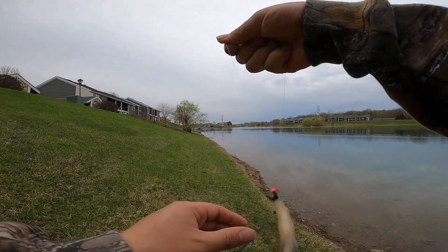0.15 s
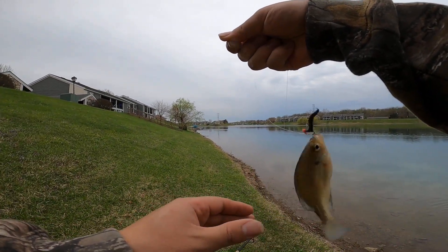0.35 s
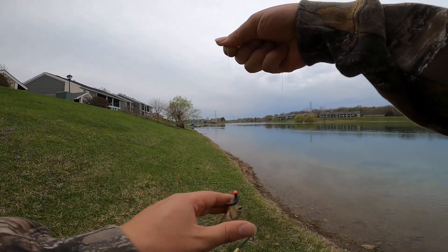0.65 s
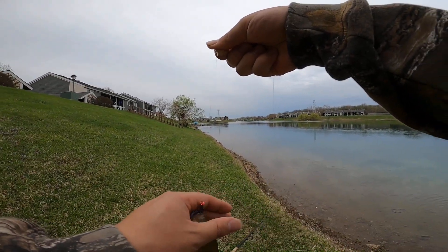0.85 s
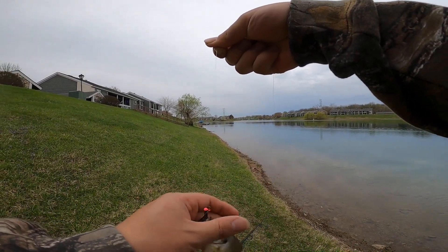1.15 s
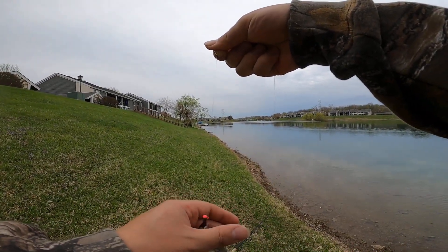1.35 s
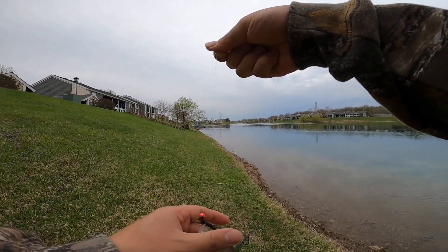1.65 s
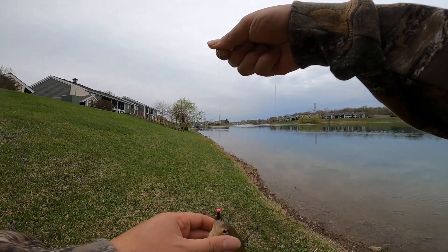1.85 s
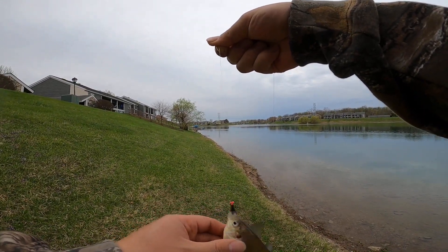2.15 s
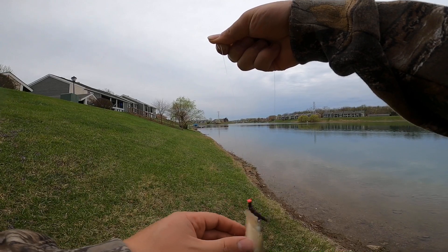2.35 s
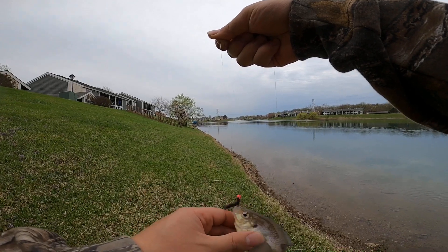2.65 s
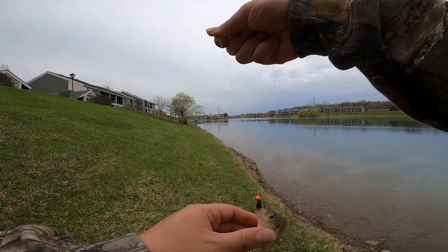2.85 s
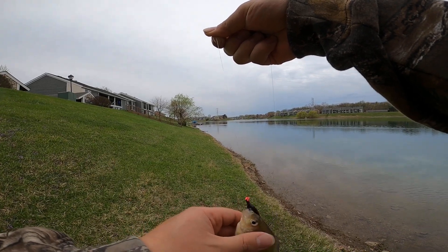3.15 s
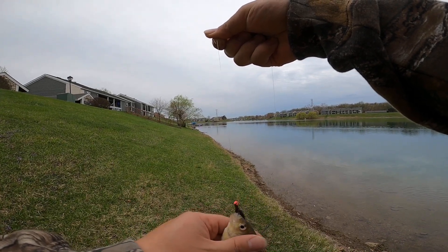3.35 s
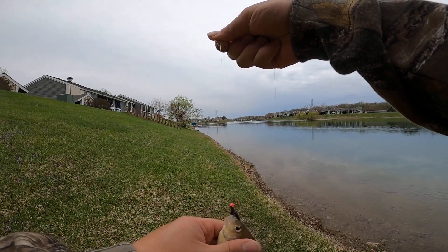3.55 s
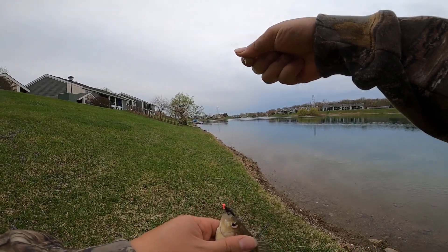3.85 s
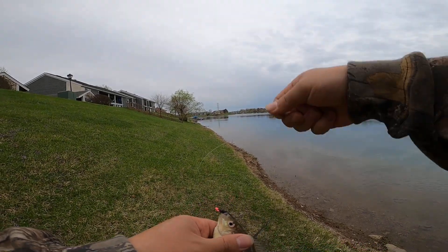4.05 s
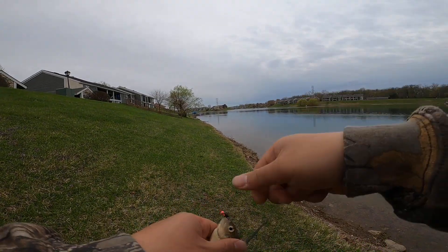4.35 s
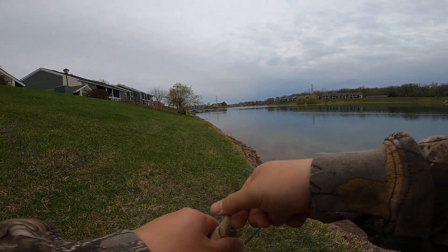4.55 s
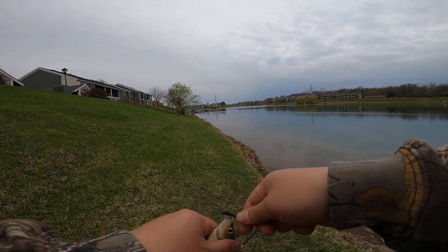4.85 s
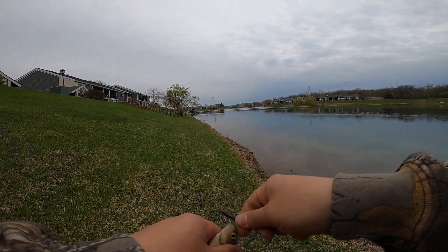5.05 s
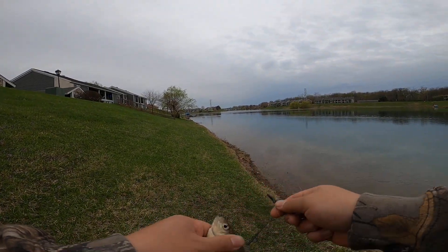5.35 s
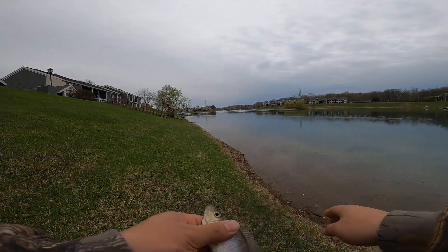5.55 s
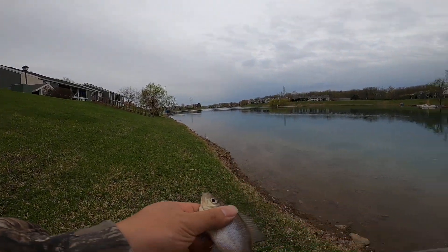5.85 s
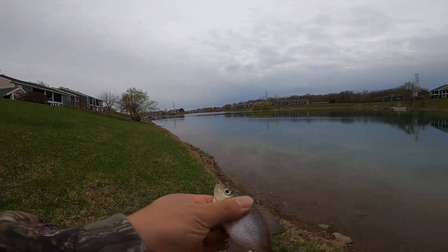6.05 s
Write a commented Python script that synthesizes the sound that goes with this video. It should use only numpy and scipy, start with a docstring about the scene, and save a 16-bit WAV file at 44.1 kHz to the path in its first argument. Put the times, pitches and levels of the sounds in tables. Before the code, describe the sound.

Close wet clicks and squelches of a small fish being handled, with birdsong echoing outdoors, a faint motor drone and puffs of wind.

```python
"""Pond with birds and an angler

Small birds sing around a pond while an angler unhooks a small fish close to the microphone.
Pitch curves drive sines for whistles, chips and a buzzing trill; filtered echoes scatter them from the banks.
Shaped noise bursts make wet fingers and line tick; swelling noise makes the sleeve rustle and the wind puff.
Wavering tones under it are a distant engine drone, a second motor and a hum; noise is the far traffic."""
import sys
import numpy as np
from scipy import signal
from scipy.fft import rfft, irfft
from scipy.io import wavfile
from scipy.ndimage import uniform_filter1d

SR = 44100
rng = np.random.default_rng(int(sys.argv[2]) if len(sys.argv) > 2 else 0)


def wrap_up_sound(samples):
    """Save the sound to the file named by the first command line argument, as 16-bit audio."""
    columns = np.atleast_2d(samples).T
    # keep every value between -1 and 1, then stretch to whole-number steps
    tamed = np.clip(columns, -1, 1)
    steps = np.round(tamed * 32767).astype(np.int16)
    wavfile.write(sys.argv[1], SR, steps)


N = 273420
TIME = np.arange(N) / SR
FREQ = np.fft.rfftfreq(N, 1 / SR)

# Table pitches and levels are nominal: waver, flicker, pan, gains and echoes come on top.

# Arched phrase. Each row: time from its start in seconds, pitch in Hz, relative level in dB.
ARCH_SHAPE = [(0, 3250, -11), (.011, 4750, -7), (.025, 4950, -6), (.042, 4550, -1), (.053, 3750, -4),
              (.064, 3200, -13), (.086, 3000, -9), (.11, 3750, -5), (.133, 4500, -6), (.147, 3500, -9)]
# Thin lisp. Each row: time from its start in seconds, pitch in Hz, relative level in dB.
LISP_SHAPE = [(0, 5650, -11), (.025, 5860, -6), (.04, 6100, -6), (.054, 6610, -17.5)]
# Lisp and arch together. Each row: arch start in seconds, arch level in dB, lisp level in dB,
# clearness of the direct path in dB.
PHRASES = [(-.003, -57.5, -72, -0.5), (0.579, -60.5, -78, 1.5), (1.554, -57.5, -61.5, 4),
           (2.065, -56.5, -64.5, 2), (2.648, -56, -63, 0.5), (3.275, -60, -69.5, -1),
           (3.947, -59, -71.5, 1.5), (5.824, -65, -74, 0.5)]
LISP_LEAD_S = .046
# Distant engine level. Each row: time in seconds, level in dB.
DRONE_LEVEL = [(0, -60), (.7, -60), (.92, -44.5), (1.05, -54.5), (1.6, -51), (1.9, -61.5), (2.15, -55),
               (2.38, -43), (2.6, -51.5), (3.3, -54), (3.6, -49), (4.5, -48.5), (5.2, -49.5), (5.7, -55.5),
               (6.2, -49.5)]
DRONE_HZ, DRONE_SAG_HZ_PER_S2 = 125.6, .195
# Second, higher motor that runs down. Each row: time in seconds, pitch in Hz, level in dB.
MOTOR = [(0, 230.3, -61), (1, 230.3, -69.5), (2, 227.7, -72), (4.2, 216.4, -71.5), (4.6, 213.7, -68),
         (6.2, 213, -69.5)]
# Electric hum. Each row: frequency in Hz, level in dB.
HUM_LINES = [(60, -56.5), (120.3, -60.5), (240.3, -65), (361, -76.5)]
# Far traffic and open air. Each row: frequency in Hz, relative density in dB per Hz.
AIR_SPECTRUM = [(25, -6.5), (45, -3.5), (65, 3.5), (105, -3), (160, -9), (210, -17), (300, -23),
                (500, -27.5), (800, -34), (1050, -29), (1900, -50), (4000, -67), (7500, -62.5),
                (10500, -75.5)]
AIR_DB = -48.5
# Faint hiss from the houses. Each row: frequency in Hz, relative density in dB per Hz.
SHORE_SPECTRUM = [(700, -7.5), (1500, 15.0), (2600, -3.5), (4200, -11.5), (6000, -13.5), (15000, -56.5)]
# Tyres singing on a far road. Each row: time in seconds, pitch in Hz, level in dB.
TYRE_BAND = [(0, 1051, -72), (2.2, 997.5, -83), (3.2, 1015, -81), (4.1, 1126, -72), (4.35, 1354, -73),
             (4.8, 1051, -85.5), (6.2, 1051, -71)]
# Wind at the ports. Each row: frequency in Hz, relative density in dB per Hz.
WIND_SPECTRUM = [(20, 7), (45, 14.5), (70, -6.5), (120, -25.5), (300, -26.5), (2000, -79.0)]
# Puffs of wind. Each row: peak time in seconds, half length in seconds, level in dB.
PUFFS = [(1.44, 0.088, -48), (1.63, 0.046, -51), (4.3, 0.33, -64.5), (5.3, 0.14, -59.5),
         (5.935, 0.022, -33.5), (6.02, 0.019, -33), (6.14, 0.15, -50)]
# Cloth. Each row: frequency in Hz, relative density in dB per Hz.
SLEEVE_SPECTRUM = [(200, 12.5), (500, 8), (1200, 4.5), (2500, 2), (4500, -3.5), (7500, -9.5), (10000, -24),
                   (15000, -30.5)]
# Arm movements that rub the sleeve. Each row: peak time in seconds, half length in seconds, level in dB.
RUBS = [(.1, 0.22, -80), (.45, 0.7, -75), (1.55, 0.13, -70.5), (2.65, 0.24, -76), (3.22, 0.17, -75),
        (4.22, 0.37, -72.5), (5.1, 0.32, -71), (6.19, 0.29, -59.5)]
SLEEVE_REST_DB = -86.5
# Wet skin. Each row: frequency in Hz, relative density in dB per Hz.
CRACKLE_SPECTRUM = [(400, -16.5), (1300, 6), (3500, 5.5), (5500, -1.5), (8500, -3.5), (11000, -13.5),
                    (15000, -30)]
# Snaps of line and wet skin. Each row: time in seconds, level in dB, ring in Hz,
# crackle relative to the ring in dB, left minus right in dB.
SNAPS = [(0.04, -42.5, 7400, -22, -3), (0.2255, -37.5, 3250, -6, -1), (0.258, -48.5, 6500, -14, -13),
         (0.3251, -55, 6160, -22, -13), (0.511, -57, 6700, -20, -12), (0.521, -55.5, 8600, -10, 3),
         (.591, -57.5, 8800, -14, 3), (0.8397, -53, 7800, 0, -3), (.971, -68, 9900, -14, 0),
         (1.1056, -52.5, 4970, -6, -8), (1.125, -65, 8500, 0, -2), (1.1612, -52.5, 6800, -18, -10),
         (1.206, -49, 8440, -19, -2), (1.246, -77, 7000, 0, -2), (1.428, -65, 7600, -8, -8),
         (1.457, -61, 6200, -14, -6), (1.596, -33, 3370, -5.5, 0), (1.619, -63, 7800, -4, -3),
         (1.6895, -72, 7800, -10, -3), (1.741, -65, 8340, 4, -2), (2.1457, -48, 7140, -7, -4),
         (2.64, -45, 3620, -4, 0), (2.6805, -57, 3300, 2, 2), (3.883, -58, 8400, 4.5, -4),
         (3.8985, -55, 7540, -6, -8), (6.159, -46.5, 3960, -1.5, -2)]
SNAP_S, SNAP_Q = 0.00064, 4
# Fingers slipping on the wet fish. Each row: time in seconds, level in dB, ring in Hz, nominal length in seconds.
SQUELCHES = [(0.0116, -63, 5900, 0.0025), (0.062, -71, 7000, .003), (0.186, -67, 3600, 0.006),
             (0.199, -61.5, 8000, 0.0065), (0.339, -64.5, 6700, 0.0023), (.399, -74, 7460, .008),
             (0.424, -63.5, 4120, 0.0033), (0.435, -72, 3000, .003), (0.531, -65.5, 7500, .002),
             (0.835, -67, 5500, 0.0071), (1.014, -51.5, 1320, 0.0034), (1.054, -60.5, 2290, 0.006),
             (1.067, -65, 7000, 0.007), (1.087, -76, 4000, .015), (1.177, -77, 9000, .004),
             (1.2, -78, 9000, .005), (1.205, -60, 1520, .002), (1.301, -67, 2000, 0.0052),
             (1.311, -68, 2500, 0.0075), (1.319, -57, 7900, 0.0022), (1.45, -62, 6860, 0.0033),
             (1.473, -59, 6700, 0.00095), (1.562, -56.5, 2120, 0.0078), (1.578, -53.5, 7000, 0.0033),
             (1.602, -63, 9450, 0.004), (1.748, -71, 4550, 0.008), (4.673, -70, 8050, 0.0067),
             (4.747, -72, 6750, 0.0039), (4.762, -75, 6500, .003)]
SQUELCH_Q, SQUELCH_CRACKLE_DB, SQUELCH_PAN_DB = 3.8, 4, -2.5
# Faint ticks while the fish wriggles
STRUGGLE_S, FIDGET_DB = 1.7, -81
# Raspy gliding notes. Each row: start in seconds, length in seconds, start in Hz, end in Hz, level in dB.
ZEES = [(0.083, .07, 5900, 6970, -75), (0.196, 0.057, 6600, 7970, -71), (2.729, 0.095, 5620, 7700, -70.5),
        (2.808, 0.057, 6970, 6100, -73.5), (2.869, 0.066, 5780, 7500, -69), (5.129, 0.042, 6500, 5370, -70),
        (5.2, .09, 5300, 6880, -67), (5.261, 0.07, 3460, 4690, -64)]
ZEE_RASP_HZ = 337
# Clear whistles. Each row: start in seconds, length in seconds, start in Hz, end in Hz, level in dB.
WHISTLES = [(0.122, 0.03, 5770, 5900, -57), (0.546, .028, 5920, 5860, -74), (0.584, 0.03, 5600, 5080, -70),
            (1.624, 0.015, 3800, 3900, -60.5), (1.795, 0.038, 3300, 3250, -76),
            (2.65, .04, 5350, 4900, -67), (2.723, 0.072, 3020, 3160, -62),
            (2.924, 0.097, 4680, 4620, -77.5), (3.382, 0.076, 2710, 2630, -78.5),
            (3.714, 0.13, 2514, 2480, -77), (3.796, 0.22, 2230, 2230, -79),
            (3.903, 0.071, 3105, 3045, -68.5), (3.978, 0.064, 2680, 2650, -73),
            (4.367, 0.036, 2564, 2705, -68), (4.405, 0.055, 2020, 1900, -73.5),
            (4.447, 0.096, 2460, 2740, -65.5), (5.16, 0.033, 2160, 2085, -70),
            (5.181, 0.0086, 3700, 4900, -62), (5.431, 0.041, 2350, 2420, -73),
            (5.463, 0.075, 3180, 2920, -68), (5.832, .05, 4840, 4490, -71), (5.868, 0.083, 5730, 5650, -77),
            (5.95, 0.022, 7500, 7950, -78), (6.013, 0.019, 3300, 4300, -64)]
# Fish kicks that jolt the hand. Each row: time in seconds, level in dB, pitch in Hz.
THUMPS = [(0.224, -40, 164), (1.013, -34.5, 118), (1.576, -48.5, 177)]
# Scooping syllable. Each row: time from its start in seconds, pitch in Hz, relative level in dB.
SCOOP_SHAPE = [(0, 1400, -21), (.011, 1720, -12), (.023, 2400, -3), (.035, 2570, 0), (.05, 2370, -6),
               (.057, 2750, -9), (.062, 5200, -14), (.069, 7500, -19)]
# Each row: scoop start in seconds, level in dB.
SCOOP_TIMES = [(0.233, -63), (0.611, -63.5), (0.993, -63), (1.286, -64), (1.624, -65.5), (1.927, -69),
               (2.278, -62), (2.586, -59.5)]
# Notes that fall ever faster. Each row: start in seconds, length in seconds, top pitch in Hz, level in dB.
SLURS = [(0.91, 0.027, 4180, -76), (3.236, 0.04, 2950, -68), (3.665, 0.039, 3000, -73.5),
         (4.35, 0.033, 3596, -62), (4.397, 0.014, 2670, -67), (4.652, 0.036, 3720, -65),
         (4.885, 0.038, 3560, -62), (5.092, 0.031, 3610, -61.5), (5.202, 0.039, 5007, -60),
         (5.222, 0.031, 3050, -73)]
SLUR_DROP, SLUR_BEND = 0.41, 1.7  # share of the pitch lost, power of time by which it goes
# Chip. Each row: time from its start in seconds, pitch in Hz, relative level in dB.
CHIP_SHAPE = [(0, 5300, -12), (.007, 5680, -1), (.014, 5820, 0), (.023, 5620, -2), (.03, 5150, -16)]
# Each row: chip start in seconds, level in dB.
CHIP_TIMES = [(2.803, -61), (5.162, -44)]
# Husky notes of a far warble. Each row: start in seconds, length in seconds, start in Hz, end in Hz, level in dB.
WARBLES = [(4.785, 0.047, 2340, 2490, -77.5), (4.841, 0.053, 2120, 2450, -74),
           (4.878, 0.057, 2500, 2406, -68.5), (4.914, 0.064, 2370, 2140, -73.5),
           (4.944, 0.091, 2620, 2444, -73), (4.985, .03, 2080, 1950, -74.5), (5.026, .075, 2750, 2760, -71),
           (5.032, .09, 2320, 2500, -72), (5.161, 0.044, 2760, 2730, -74), (5.185, .03, 2450, 2410, -73),
           (5.245, 0.081, 2030, 2200, -70), (5.333, 0.036, 2960, 2654, -72.5)]
# Buzzing trill, which sags and then climbs. Each row: time in seconds, centre pitch in Hz.
BUZZ_PITCH = [(5.21, 4190), (5.32, 4040), (5.5, 4195), (5.66, 4270)]
BUZZ_START_S, BUZZ_LENGTH_S, BUZZ_ATTACK_S, BUZZ_RELEASE_S = 5.218, 0.446, 0.03, 0.012
BUZZ_DB = -64.5
# Swelling whistle that breaks into wiggles. Each row: time from its start in seconds, pitch in Hz,
# relative level in dB.
FLOURISH_SHAPE = [(0, 2050, -14), (.012, 2400, -5), (.03, 2430, -3), (.058, 2570, 2), (.084, 2590, 0),
                  (.091, 2800, -8), (.115, 2530, -6), (.138, 3050, -5), (.155, 2350, -1), (.164, 2020, -15),
                  (.176, 2330, -4), (.19, 2000, -17), (.208, 2650, -17), (.218, 2430, -1),
                  (.227, 1950, -15), (.234, 2150, -15), (.241, 2380, -2), (.25, 2020, -12),
                  (.266, 2350, -14)]
FLOURISH_START_S, FLOURISH_DB = 5.515, -59
# Runs of tiny sliding notes. Each row: start in seconds, length in seconds, centre pitch in Hz, level in dB,
# notes per second, slide within a note in Hz.
TWITTERS = [(5.531, 0.2, 3510, -70.5, 47, 447), (5.747, 0.172, 3090, -66, 48.6, -600)]
TOP_HZ = 15500


def undb(db):
    """Decibels to gain."""
    return 10 ** (np.asarray(db) / 20)


def unit(x):
    """Scale to rms 1."""
    return x / np.sqrt(np.mean(x ** 2))


def curves(rows, t):
    """Each column of a table, joined by straight lines at times t."""
    s, *columns = np.transpose(rows)
    return [np.interp(t, s, c) for c in columns]


def walk(rate_hz, size=N):
    """Smooth random wander with a spread near 1."""
    k = int(SR / rate_hz)
    steps = np.repeat(rng.standard_normal(size // k + 2), k)
    return np.sqrt(2) * uniform_filter1d(uniform_filter1d(steps, k), k)[:size]


def noise(spectrum):
    """Noise of rms 1 with the given spectrum, rolled off below 20 Hz."""
    hz, db = np.transpose(spectrum)
    gain = undb(np.interp(np.log(FREQ + 1), np.log(hz), db))
    gain = gain * FREQ ** 2 / (FREQ ** 2 + 20 ** 2)
    return unit(irfft(rfft(rng.standard_normal(N)) * gain, N))


def tone(hz):
    """A sine of rms 1 that follows a pitch curve."""
    return np.sqrt(2) * np.sin(2 * np.pi * np.cumsum(hz) / SR + rng.uniform(0, 2 * np.pi))


def add(track, start_s, x):
    """Mix a short sound into a track."""
    i = int(start_s * SR)
    a, b = max(i, 0), min(i + x.shape[-1], N)
    track[..., a:b] += x[..., a - i:b - i]


def place(x, pan_db, lag_ms):
    """Two microphone ports: the left is pan_db louder and hears the sound lag_ms later."""
    late = irfft(rfft(x) * np.exp(-2j * np.pi * FREQ * lag_ms / 1000), N)
    return np.array([late * undb(pan_db / 2), x * undb(-pan_db / 2)])


def banks(x, near_db, far_db, near_t60_s=0.41, far_t60_s=0.78, split_hz=4900, treble_t60_s=0.5):
    """Lawn and house walls scatter quickly, trees across water return a long tail; air takes treble first."""
    t = TIME[:SR]
    tails = rng.standard_normal((2, 2, SR)) * np.clip((t - .004) / 0.0085, 0, 1)
    low = signal.sosfiltfilt(signal.butter(4, split_hz, fs=SR, output="sos"), tails)
    tails = low + (tails - low) * undb(-60 * t / treble_t60_s)
    near = unit(tails[0] * undb(-60 * t / near_t60_s)) / np.sqrt(SR)
    far = unit(tails[1] * undb(-60 * t / far_t60_s)) / np.sqrt(SR)
    echoes = undb(near_db) * near + undb(far_db) * far
    return signal.fftconvolve(x[None], echoes, axes=1)[:, :N]


def branches(x, span_s=0.019, count=14):
    """A call from inside a tree arrives by many short paths, which break up its glide."""
    taps = np.zeros((2, int(SR * .1)))
    for side in taps:
        share, size = rng.uniform(0.026, 1, count), rng.standard_normal(count)
        delays = (share * min(span_s, .09) * SR).astype(int)
        np.add.at(side, delays, unit(size * np.exp(-share)) / np.sqrt(count))
    return signal.fftconvolve(x[None], taps, axes=1)[:, :N]


def syllables(shape, times, waver, third_db=None, flicker_db=3.5):
    """One gliding syllable, a little different each time; a near voice shows its third harmonic."""
    out, t = np.zeros(N), np.arange(int(shape[-1][0] * SR)) / SR
    hz, db = curves(shape, t)
    fade = signal.windows.tukey(len(t), .12)
    for start_s, level_db in times:
        pitch_hz = hz * (1 + waver * walk(250, len(t)))
        voice = tone(pitch_hz)
        if third_db is not None:
            voice = voice + undb(third_db) * tone(3 * pitch_hz)
        gain = undb(level_db + db + flicker_db * walk(143, len(t)))
        add(out, start_s, voice * gain * fade)
    return out


def note(track_hz, db, taper):
    """A whistled note along a pitch curve, faded in and out."""
    return tone(track_hz) * undb(db) * signal.windows.tukey(len(track_hz), min(taper, 1))


def glides(rows, waver_hz, rate_hz, taper):
    """Notes gliding straight from one pitch to another, with random waver."""
    out = np.zeros(N)
    for start_s, length_s, from_hz, to_hz, db in rows:
        size = int(length_s * SR)
        pitch_hz = np.linspace(from_hz, to_hz, size) + waver_hz * walk(rate_hz, size)
        add(out, start_s, note(pitch_hz, db, taper))
    return out


def swells(rows, sharpness):
    """Gain of smooth rises and falls, one for each row, summed in power."""
    return np.sqrt(sum(undb(2 * db) * np.exp(-2 * np.abs((TIME - s) / half_s) ** sharpness)
                       for s, half_s, db in rows))


def arch_singer(paths_db=-6.5, direct_db=-4.5, wall_s=0.015, wall_db=-12.5):
    """A far bird repeats a lisp and an arched phrase, which branches scatter and a house wall returns."""
    arches = [(s, db) for s, db, _, _ in PHRASES]
    lisps = [(s - LISP_LEAD_S, db) for s, _, db, _ in PHRASES]
    song = syllables(ARCH_SHAPE, arches, waver=0.026, flicker_db=2.5)
    song = song + syllables(LISP_SHAPE, lisps, waver=0.025)
    clear_db, = curves([(s, db) for s, _, _, db in PHRASES], TIME - LISP_LEAD_S)
    direct = undb(direct_db + clear_db) * place(song, pan_db=9.0, lag_ms=-0.084)
    wall = undb(wall_db) * place(np.interp(TIME - wall_s, TIME, song), pan_db=8.5, lag_ms=0.08)
    paths = undb(paths_db) * branches(song, span_s=.016)
    return direct + paths + wall + banks(song, near_db=-7.5, far_db=-13, near_t60_s=.22)


def hum(waver_db=2.0, beat=0.45, octave_db=-19):
    """Two far motors and an electric hum: sines that moving air makes waver."""
    drone_hz = DRONE_HZ - DRONE_SAG_HZ_PER_S2 * TIME ** 2
    drone_db, = curves(DRONE_LEVEL, TIME)
    lines = [(drone_hz, drone_db), (2 * drone_hz, drone_db + octave_db), tuple(curves(MOTOR, TIME))]
    lines += [(hz + 0.732 * walk(6), db) for hz, db in HUM_LINES]
    out = np.zeros(N)
    for hz, db in lines:
        # a second path, drifting in strength and phase, beats against the first
        out += (tone(hz) + beat * walk(26) * tone(hz)) * undb(db + waver_db * walk(14))
    return place(out, pan_db=1, lag_ms=.09)


def open_air(side_db=-11, side_hz=500, shore_db=-80):
    """Far traffic from one side, more diffuse towards the treble; faint hiss from houses on the left."""
    wash = noise(AIR_SPECTRUM) * undb(.9 * walk(3.1) + 1.2 * walk(16))
    tilt = (FREQ + side_hz / 4) / (FREQ + side_hz)
    side = irfft(rfft(noise(AIR_SPECTRUM)) * tilt, N) * undb(side_db)
    traffic = undb(AIR_DB) * (place(wash, pan_db=0.0, lag_ms=0.14) + np.array([side, -side]))
    shore = noise(SHORE_SPECTRUM) * undb(shore_db + 0.25 * walk(3.8))
    return traffic + place(shore, pan_db=2.0, lag_ms=0)


def tyres(width_hz=110):
    """A narrow band of tread noise that drifts in pitch: a sine multiplied by low noise."""
    hz, db = curves(TYRE_BAND, TIME)
    flutter = noise([(20, 0), (width_hz, 0), (4 * width_hz, -24), (10000, -90)])
    return place(tone(hz) * flutter * undb(db), pan_db=0.5, lag_ms=0.12)


def wind(eddy_db=-57):
    """Low noise: independent air eddies at each port, and puffs mostly on the right one."""
    eddies = undb(eddy_db) * np.array([noise(WIND_SPECTRUM), noise(WIND_SPECTRUM)])
    puffs = noise(WIND_SPECTRUM) * swells(PUFFS, sharpness=1.8)
    return eddies + place(puffs, pan_db=-11, lag_ms=0)


def sleeve(rub_db=1.5, rasp_db=-27):
    """Cloth noise swells as the arm moves, brighter when it rubs harder."""
    rub = swells(RUBS, sharpness=1.64) + undb(SLEEVE_REST_DB)
    cloth = place(noise(SLEEVE_SPECTRUM), pan_db=3.0, lag_ms=0.029)
    cloth = cloth + undb(-1.5) * np.array([noise(SLEEVE_SPECTRUM), noise(SLEEVE_SPECTRUM)])
    rasp = undb(rasp_db) * rub / rub.max() * rng.standard_normal((2, N))
    return (cloth + rasp) * rub * undb(rub_db * walk(120))


def chorus(count=260, low_hz=2200, high_hz=4800, slide=.16):
    """Many birds far across the water: random short glides blurred into a murmur of echoes."""
    out = np.zeros(N)
    for when, pitch, length, glide, loud in rng.random((count, 5)):
        size = int((0.018 + 0.044 * length) * SR)
        centre_hz = low_hz * (high_hz / low_hz) ** pitch
        hz = centre_hz * (1 + slide * (2 * glide - 1) * np.linspace(-1, 1, size))
        add(out, when * N / SR, tone(hz) * (1 + loud) * np.hanning(size))
    out = unit(out)
    return undb(-92.0) * (place(out, pan_db=18.5, lag_ms=0.025) + banks(out, near_db=5.5, far_db=-8))


def handling(grain_db=5.5, uneven_db=4.5, rise=0.59, lag_ms=0.028):
    """Wet skin and line tick: resonant snaps with broad crackle, in short noise bursts."""
    out, t, crackle = np.zeros((2, N)), TIME[:2048] - TIME[512], noise(CRACKLE_SPECTRUM)
    bursts = [(s, db, hz, SNAP_Q, SNAP_S, broad_db, pan_db) for s, db, hz, broad_db, pan_db in SNAPS]
    fidgets = [(STRUGGLE_S * when, FIDGET_DB + 6 * (loud - .5), 4000 + 6000 * pitch, .0015)
               for when, loud, pitch in rng.random((55, 3))]
    bursts += [(s, db, hz, SQUELCH_Q, length_s, SQUELCH_CRACKLE_DB, SQUELCH_PAN_DB)
               for s, db, hz, length_s in SQUELCHES + fidgets]
    for k, (start_s, db, hz, q, length_s, broad_db, pan_db) in enumerate(bursts):
        envelope = np.exp(-np.abs(t) / length_s / np.where(t < 0, rise, .7))
        envelope = envelope * undb(grain_db * walk(974, len(t)) + uneven_db * walk(350, len(t)))
        b, a = signal.iirpeak(min(hz, .4 * SR), max(q, 1), fs=SR)
        snap = signal.lfilter(b, a, signal.lfilter(b, a, envelope * rng.standard_normal(len(t))))
        burst = unit(snap) + undb(broad_db) * unit(envelope * crackle[k * len(t):][:len(t)])
        # level refers to the burst's nominal length, not to the whole window
        burst = burst * np.sqrt(length_s * SR / len(t) / 2)
        sides_db = db + np.array([[pan_db], [-pan_db]]) / 2
        add(out, start_s + t[0] + 0.00093, burst * undb(sides_db))
    return np.array([place(out[0], 0, lag_ms)[0], out[1]])


def rasps():
    """Gliding notes roughened by a fast flutter of pitch and sprayed about by branches."""
    out = glides(ZEES, ZEE_RASP_HZ, rate_hz=1500, taper=0.55)
    direct = place(out, pan_db=3, lag_ms=-0.024) * undb(-2.5)
    return direct + undb(-3.5) * branches(out, span_s=0.016) + banks(out, near_db=-11.5, far_db=-15)


def whistlers():
    """Clear level or sliding whistles: sines with a slight waver."""
    out = glides(WHISTLES, waver_hz=20, rate_hz=300, taper=0.61)
    return place(out, pan_db=0, lag_ms=0.051) + banks(out, near_db=-12.5, far_db=-14)


def thumps(decay_s=0.0084):
    """The fish's kicks are dull knocks: low sines that die exponentially."""
    out, t = np.zeros(N), TIME[:4096]
    for start_s, db, hz in THUMPS:
        add(out, start_s, 2 * undb(db) * np.sin(2 * np.pi * hz * t) * np.exp(-t / decay_s))
    return place(out, pan_db=0.0, lag_ms=0)


def scooper():
    """A nearer bird scoops upward, with a faint third harmonic and scatter from branches."""
    voice = syllables(SCOOP_SHAPE, SCOOP_TIMES, waver=0.011, third_db=-25.5)
    direct = place(voice, pan_db=6.0, lag_ms=0.018) * undb(-1.0)
    return direct + undb(-8) * branches(voice) + banks(voice, near_db=-11, far_db=-19)


def slurrer(waver=0.013, taper=0.66):
    """Each slur starts level and drops away ever faster."""
    out = np.zeros(N)
    for start_s, length_s, top_hz, db in SLURS:
        u = np.linspace(0, 1, int(length_s * SR))
        hz = top_hz * (1 - SLUR_DROP * u ** SLUR_BEND) * (1 + waver * walk(210, len(u)))
        add(out, start_s, note(hz, db, taper))
    direct = place(out, pan_db=3.5, lag_ms=0.049) * undb(-1.0)
    return direct + undb(-9) * branches(out, span_s=.012) + banks(out, near_db=-13.5, far_db=-7)


def chipper(roughness_hz=1300):
    """Short arched chips, each followed by a faint broad noisy tail."""
    voice = syllables(CHIP_SHAPE, CHIP_TIMES, waver=0.008)
    noisy_tail = banks(voice * walk(roughness_hz), near_db=-11.0, far_db=-22, near_t60_s=.3)
    return place(voice, pan_db=1.5, lag_ms=-0.037) + noisy_tail


def warbler():
    """A far bird warbles soft notes, husky from fast pitch waver, each at a pitch of its own."""
    out = glides(WARBLES, waver_hz=55, rate_hz=600, taper=0.48)
    return place(out, pan_db=3, lag_ms=0.043) + banks(out, near_db=-8, far_db=-8)


def buzzing_trill(buzz_hz=320, swing_hz=230, rough=.22, beak_hz=3930, beak_width_hz=1000,
                  waver_hz=8, jitter_hz=30):
    """Uneven sliding pulses so fast they split into side tones; the open beak favours the lower ones."""
    hz, t = curves(BUZZ_PITCH, TIME)[0], TIME - BUZZ_START_S
    hz = hz + waver_hz * walk(70) + jitter_hz * walk(700)
    cycle = 2 * np.pi * np.cumsum(buzz_hz * (1 + 0.016 * walk(150))) / SR
    pulses = tone(hz - swing_hz * np.sin(cycle)) * (1 + np.cos(cycle)) * (1 + rough * walk(600))
    b, a = signal.iirpeak(beak_hz, beak_hz / beak_width_hz, fs=SR)
    buzz = unit(signal.lfilter(b, a, signal.lfilter(b, a, pulses)))
    fade = np.clip(np.minimum(t / BUZZ_ATTACK_S, (BUZZ_LENGTH_S - t) / BUZZ_RELEASE_S), 0, 1)
    buzz = buzz * undb(BUZZ_DB) * fade
    return place(buzz, pan_db=-.5, lag_ms=.021) + banks(buzz, near_db=-18, far_db=-26)


def flourish():
    """One bird ends its warble on a long note and a few quick turns of pitch and level."""
    voice = syllables(FLOURISH_SHAPE, [(FLOURISH_START_S, FLOURISH_DB)], waver=0.0078, flicker_db=1.0)
    return place(voice, pan_db=-1, lag_ms=0.08) + banks(voice, near_db=-15, far_db=-10)


def twitterer(wander_hz=45, uneven_db=1.0):
    """Quick runs of tiny separate notes that flick up or down, no two quite alike."""
    run = np.zeros(N)
    for start_s, length_s, hz, db, rate_hz, slide_hz in TWITTERS:
        phase = TIME[:int(length_s * SR)] * rate_hz % 1
        pitch_hz = hz + slide_hz * (phase - .5) + wander_hz * walk(60, len(phase))
        level_db = db + uneven_db * walk(59, len(phase))
        add(run, start_s, note(pitch_hz, level_db, taper=0.2) * np.sin(np.pi * phase) ** 3)
    return place(run, pan_db=5.0, lag_ms=0.033) + banks(run, near_db=-9, far_db=-13)


def scene():
    """Birds, hands and background together."""
    background = hum() + open_air() + tyres() + wind()
    hands = sleeve() + handling() + thumps()
    birds = arch_singer() + chorus() + rasps() + whistlers() + scooper() + slurrer() + chipper()
    birds = birds + warbler() + buzzing_trill() + flourish() + twitterer()
    return background + hands + birds


def record(dry):
    """The level dips briefly, once, and the top is cut."""
    dip = (TIME > 2.2145) & (TIME < 2.2345)
    top_cut = signal.ellip(8, .2, 70, TOP_HZ, fs=SR, output="sos")
    return signal.sosfilt(top_cut, dry * np.where(dip, undb(-24.0), 1))


dry = scene()
out = record(dry)
wrap_up_sound(out)
```